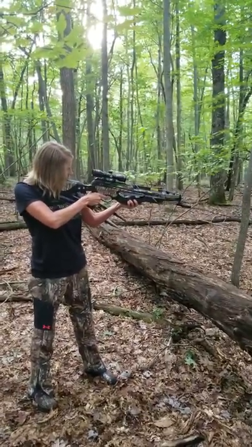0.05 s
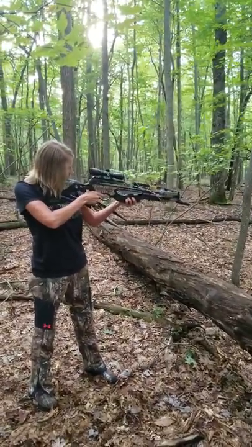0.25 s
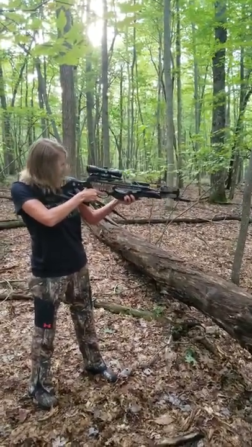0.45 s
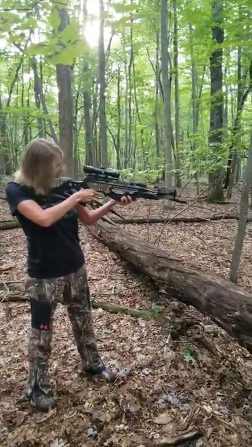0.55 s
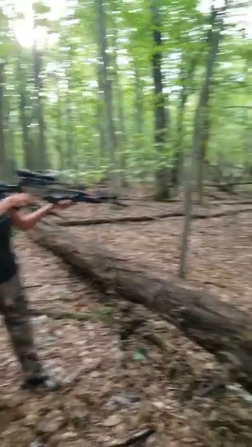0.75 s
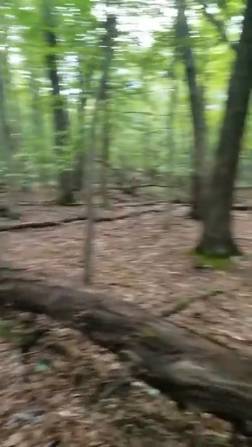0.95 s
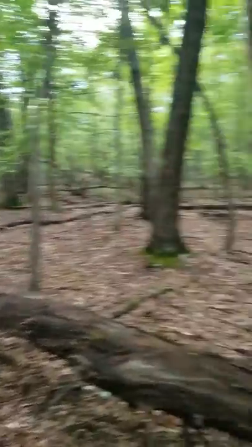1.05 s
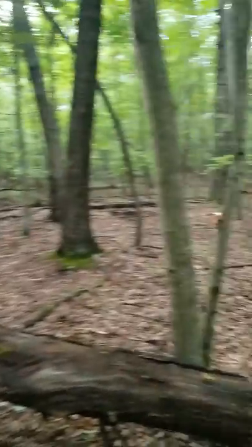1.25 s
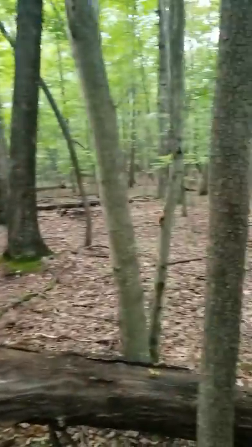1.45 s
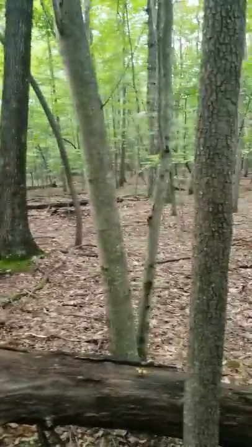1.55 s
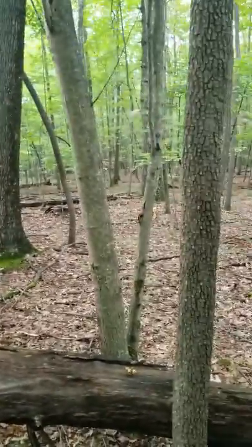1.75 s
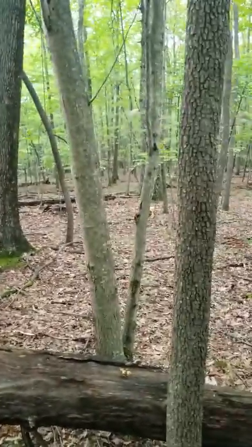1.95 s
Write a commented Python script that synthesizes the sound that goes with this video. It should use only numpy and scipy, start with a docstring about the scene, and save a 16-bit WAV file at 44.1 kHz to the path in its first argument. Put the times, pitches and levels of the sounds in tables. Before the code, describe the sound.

A crossbow fires at about 0.2 s: a brief hiss and a loud, sharp, clattering snap with woody ringing, slightly right. At 0.34 s the bolt hits with a short dull thump, and both ring away among trees. From 0.7 to 1.3 s feet scuff crackling dry leaves close on the right, with soft heel knocks near 1.2 s and a faint last brush. Quiet low rumble, hiss and insects lie beneath.

```python
"""A crossbow is fired in a wood: enveloped noise hisses along the rail and rattles as the string slaps its stops,
while decaying modes ring in limbs and stock. The bolt thumps into a target, a few low-passed modes with dull
returns, and noise dying at two rates per band rings among the trunks. Feet then turn in dry leaves close on the
right: coloured noise, crackle, snaps and heel knocks. Behind lie a low rumble, faint hiss and a band of insects."""
import sys
import numpy as np
from scipy import signal
from scipy.fft import rfft, irfft
from scipy.io import wavfile

SR = 44100
rng = np.random.default_rng(int(sys.argv[2]) if len(sys.argv) > 2 else 0)


def file_out(sig):
    """Save sig as 16-bit WAV at sys.argv[1]."""
    # one column per channel
    cols = np.atleast_2d(sig).T
    # limit, then scale
    lim = np.clip(cols, -1, 1)
    pcm = np.round(lim * 32767).astype(np.int16)
    wavfile.write(sys.argv[1], SR, pcm)


N = 88200
T = np.arange(N) / SR   # time [s]

# Low rumble and faint hiss of the wood: (frequency [Hz], density [dB per Hz])
AIR_SPECTRUM = [(15, -41), (25, -11), (145, -3.5), (270, -17.5), (439, -34.5), (2410, -35.5), (3080, -40.5),
                (16000, -45.5)]
# Swell of the rumble, used about its own mean: (time [s], level [dB])
RUMBLE_SWELL = [(0, -57), (.7, -64.5), (1.45, -65.5), (1.65, -59.5), (2, -60)]
# Loudness of the insect band: (time [s], level [dB])
INSECT_LEVEL = [(.1, -71.5), (1.3, -86.5), (2, -80)]
# Drag of feet in the leaves: (time [s], level [dB])
SCUFF_LEVEL = [(0.712, -68), (.76, -54), (.93, -50), (.955, -53), (0.984, -64), (1.06, -70), (1.08, -63),
               (1.112, -69), (1.123, -61.5), (1.2, -73), (1.44, -82)]
# Colour of the rustle, with sharp peaks in the treble: (frequency [Hz], density [dB per Hz])
RUSTLE_SPECTRUM = [(300, -2.5), (1500, 1), (3000, -5), (4100, -2.5), (5000, -8), (6100, 2), (7400, -7),
                   (9200, -0.5), (10800, -9), (12300, -4.5), (15500, -6.5)]
# Snaps of leaves and twigs, before the rustle colour: (time [s], level [dB], centre [Hz])
LEAF_SNAPS = [(.717, -48, 7500), (.7254, -45, 5960), (.7315, -48, 8000), (.7504, -44, 6032),
              (.7836, -40, 9000), (.8614, -33, 9200), (.8839, -40, 1990), (.918, -42, 9500),
              (.9223, -36, 9150), (1.0364, -55, 9500), (1.0779, -49.5, 7000), (1.1208, -41, 1800),
              (1.2236, -54, 7500), (1.2434, -54, 8900), (1.2864, -58, 9000), (1.3084, -53, 1800),
              (1.3164, -56, 9150), (1.3977, -58, 6000)]
# Soft heel knocks, before their low-pass: (time [s], level [dB], pitch [Hz])
HEEL_KNOCKS = [(1.173, -49.5, 110), (1.221, -49, 330)]
# Modes of the struck target: (pitch [Hz], left level [dB], right level [dB], t60 [s])
TARGET_MODES = [(128, -22.5, -20, 0.056), (225, -6, -8, .021), (950, -12.5, -7, .007),
                (3010, -8, -17.5, 0.0056)]
# Returns of the thump from near trunks: (delay [s], level [dB])
TRUNK_RETURNS = [(.009, -18.5), (.015, -15.5), (.034, -17), (.048, -27)]
# Modes of limbs and stock: (pitch [Hz], level [dB], t60 [s])
BOW_MODES = [(272, -10.5, 0.13), (398, -6.5, .07), (610, 0, .06), (760, -2, .06), (845, -.5, .06),
             (1005, -9, .04), (1135, -5, .06), (1247, -8, .06), (1425, -2.5, 0.05), (2130, -5, .04),
             (2466, -3, .06), (2660, -1, 0.025), (4495, -4.5, .04), (13200, -4, .012)]
# Hiss of string and bolt on the rail: (frequency [Hz], density [dB per Hz])
RAIL_SPECTRUM = [(180, -42), (300, -14.5), (3580, -0.5), (8000, -9), (16000, -7.5)]
# Rattle of the string's slap: (frequency [Hz], density [dB per Hz])
SLAP_SPECTRUM = [(150, -25), (500, -15), (1800, -4), (4400, -4.5), (6500, -11.5), (13000, -9),
                 (16000, -13.5)]
# Ringing of the wood: (frequency [Hz], early t60 [s], late t60 [s])
WOOD_DECAY = [(100, 0.32, 0.17), (260, 0.05, .6), (700, .2, 1), (1840, 0.44, 1.05), (4760, 0.22, 0.8),
              (12800, 0.12, 0.46)]
# Colour of the ringing after the shot: (frequency [Hz], density [dB per Hz])
SHOT_TAIL_SPECTRUM = [(60, -30), (302, -5), (1030, -5), (4380, -6), (12900, -12), (16000, -26.5)]
# Colour of the ringing after the hit: (frequency [Hz], density [dB per Hz])
HIT_TAIL_SPECTRUM = [(45, -25), (149, -1), (1250, -13), (3900, -8), (5090, -18), (12700, -18), (16000, -30)]
# Left-right likeness of the noise: (frequency [Hz], likeness [1 = same in both])
STEREO_LIKENESS = [(60, 1), (250, .92), (600, 1), (1200, .2), (3000, 0.15), (8000, 0.034)]

# Woods
AIR_DB = -60
INSECT_HZ, INSECT_WIDTH_HZ = 2300, 300
CHIRR_HZ, CHIRR_T60_S, CHIRR_DB, CHIRR_DB_PER_S = 2360, .07, -97, 7   # steadier singer, growing louder

# Feet
CRACKLES_PER_S, CRACKLE_DB = 900, -10
SNAP_T60_S, SNAP_WIDE_DB = 0.008, -11   # each snap also carries a broad crack
BRUSH_S, BRUSH_T60_S, BRUSH_DB, BRUSH_BAND_HZ = 1.335, .4, -56, (11200, 12800)   # last thin brush
STEP_CYCLES = 6.9   # heel t60 in cycles of its pitch
LEFT_OWN = 0.32   # power share of scattered rustle at the left port
FEET_LEFT_DB, FEET_LAG_S, SHADOW_HZ = -2, 0.00052, 2920   # left port: weaker, later, duller

# Shot and hit
LET_GO_S, SLAP_S, REBOUND_S, HIT_S = .2068, .2140, .2278, .3439
RAIL_DB, RAIL_T60_S = -17.5, .08
SLAP_DB, SLAP_RISE_S, SLAP_T60_S = -13, .004, 0.13
BOW_DB, KNOCKS_PER_S, RATTLE_DB = -13, 710, -15   # modes, and the lesser knocks that follow
SPREAD_S = .006   # the parts are jolted within this time
REBOUND_DB, REBOUND_HZ = -8, 1600   # light tap on the modes above this pitch
HIT_SOFT_HZ, TRUNK_HZ = 4460, 900   # low-pass of the blow, and of its returns
SHOT_TAIL_DB, HIT_TAIL_DB = -25, -29
LATE_DB, TAIL_RISE_S = -4, 0.0006   # late decay relative to early
SHOT_PAN_DB = 1.5   # right over left

# Microphone
LOW_CUT_HZ, CUTOFF_HZ = 50, 15750
PORT_NOTCH_HZ, PORT_NOTCH_Q = 7320, 20


def from_db(db):
    """Turn dB into gain."""
    return 10 ** (np.asarray(db) / 20)


def rms_one(x):
    """Scale to rms 1."""
    return x / np.sqrt(np.mean(x ** 2) + 1e-20)


def at_hz(points, hz, axis=1):
    """Read a table column on a log-frequency axis."""
    points = np.array(points)
    return np.interp(np.log(hz), np.log(points[:, 0]), points[:, axis])


def lowpass(x, order, hz):
    """Butterworth low-pass."""
    return signal.sosfilt(signal.butter(order, hz, fs=SR, output="sos"), x)


def bandpass(x, order, edges):
    """Butterworth band-pass between two edges in Hz."""
    return signal.sosfilt(signal.butter(order, edges, "band", fs=SR, output="sos"), x)


def drift(rate):
    """Slow random wander of rms 1: noise through two equal poles at rate Hz, made every 40 samples."""
    pole = np.exp(-80 * np.pi * rate / SR)
    white = rng.standard_normal(N // 40 + 2002)
    slow = signal.lfilter([1], [1, -2 * pole, pole ** 2], white)[2000:]   # drop the settling
    return np.interp(np.arange(N) / 40, np.arange(len(slow)), rms_one(slow))


def burst(start, rise, t60):
    """Envelope that rises from its start and dies away exponentially."""
    t = np.maximum(T - start, 0)
    return (1 - np.exp(-t / rise)) * from_db(-60 * t / t60)


def ring(clicks, hz, t60):
    """Damped resonator: a unit click sets a cosine of height 1 ringing."""
    r, w = from_db(-60 / (t60 * SR)), 2 * np.pi * hz / SR
    return signal.lfilter([1, -r * np.cos(w)], [1, -2 * r * np.cos(w), r * r], clicks + 1e-18)


def click(s):
    """A unit click at a time."""
    return 1. * (np.arange(N) == int(s * SR))


def bands(white, shape):
    """Split noise into third-octave stereo bands, each with its likeness and its gain shape(Hz)."""
    out = 0
    edges = 25 * 2 ** np.arange(0, 9.5, 1 / 3)
    for k, (low, high) in enumerate(zip(edges, edges[1:])):
        # neighbouring bands take different noise
        mid, side = bandpass(white[k % 2], 2, [low, high])
        hz = np.sqrt(low * high)
        alike = np.clip(at_hz(STEREO_LIKENESS, hz), -1, 1)
        common = np.sqrt((1 + alike) / 2) * mid
        opposed = np.sqrt((1 - alike) / 2) * side * [[1], [-1]]
        out = out + shape(hz) * (common + opposed)
    return out


def colour(spectrum, db):
    """Gain per band that gives unit white noise this spectrum and rms level."""
    density = from_db(at_hz(spectrum, np.linspace(25, 16000, 2000))) ** 2
    power = np.mean(density) * 32000 / SR
    return lambda hz: from_db(db + at_hz(spectrum, hz)) / np.sqrt(power)


def woods():
    """Lumpy low rumble, faint hiss, and a throbbing band of insects with one thin resonant tone."""
    s, db = np.transpose(RUMBLE_SWELL)
    swell = np.interp(T, s, db - np.mean(db))
    air = colour(AIR_SPECTRUM, AIR_DB)

    def floor_gain(hz):
        """Only the rumble swells and wanders; the hiss holds steady."""
        return air(hz) * (from_db(swell + 1.8 * drift(8)) if hz < 400 else 1)
    floor = bands(rng.standard_normal((2, 2, N)), floor_gain)

    edges = [INSECT_HZ - INSECT_WIDTH_HZ / 2, INSECT_HZ + INSECT_WIDTH_HZ / 2]
    song = rms_one(bandpass(rng.standard_normal((2, N)), 1, edges))
    throb = from_db(np.interp(T, *np.transpose(INSECT_LEVEL)) + 2.5 * drift(15))
    tone = rms_one(ring(rng.standard_normal(N), CHIRR_HZ, CHIRR_T60_S))
    chirr = from_db(CHIRR_DB + CHIRR_DB_PER_S * T) * tone
    return floor + chirr + throb * song


def scuff():
    """Patchy noise with sparse crackle grains, following the drag of the feet; near and scattered parts."""
    s, db = np.transpose(SCUFF_LEVEL)
    struck = rng.random((2, 2, N)) < CRACKLES_PER_S / SR
    grains = struck * rng.laplace(size=(2, 2, N)) ** 3   # cubing makes a few grains stand out
    grit = rms_one(rng.standard_normal((2, 2, N)) + from_db(CRACKLE_DB) * rms_one(grains))
    drag = bands(grit, lambda hz: from_db(2.5 * drift(25)))
    return drag * from_db(np.interp(T, s, db, -140, -140) + 1.2 * drift(60))


def snaps_and_brush():
    """Clicks with short noise snap in a band and broadly; a thin band of noise brushes last."""
    out, noise = 0, rng.standard_normal(N)
    for s, db, hz in LEAF_SNAPS:
        # the envelope opens a sample early so that the click passes
        snap = (8.0 * click(s) + noise) * burst(s - 1 / SR, 1 / SR, SNAP_T60_S)
        pitched = bandpass(snap, 2, [hz / 1.25, hz * 1.33])
        out = out + from_db(db) * (pitched + from_db(SNAP_WIDE_DB) * snap)
    stroke = burst(BRUSH_S, 0.0089, BRUSH_T60_S) * from_db(2.0 * drift(40))
    return out + from_db(BRUSH_DB) * stroke * bandpass(noise, 2, BRUSH_BAND_HZ)


def feet():
    """Coloured rustle close to the right port, shaded at the left, over low-passed heel knocks."""
    near, scattered = scuff()
    near = near + snaps_and_brush()
    lagged = np.roll(near, round(FEET_LAG_S * SR))
    left = np.sqrt(1 - LEFT_OWN) * lagged + np.sqrt(LEFT_OWN) * scattered

    hz = np.maximum(np.arange(N // 2 + 1) * SR / N, 1)
    shade = from_db(FEET_LEFT_DB) / np.sqrt(np.sqrt(1 + (hz / SHADOW_HZ) ** 2))
    port_gains = [shade, np.ones_like(shade)]
    rustle = irfft(rfft([left, near]) * colour(RUSTLE_SPECTRUM, 0)(hz) * port_gains, N)

    heels = sum(from_db(db) * ring(click(s), pitch, STEP_CYCLES / pitch) for s, db, pitch in HEEL_KNOCKS)
    return rustle + lowpass(heels, 1, 500)


def target():
    """One inward blow on the target's modes, then dull returns from near trunks."""
    blow = 0
    for hz, left_db, right_db, t60 in TARGET_MODES:
        blow = blow + from_db([[left_db], [right_db]]) * ring(-click(HIT_S), hz, t60)
    blow = lowpass(blow, 4, HIT_SOFT_HZ)
    dull = lowpass(blow, 1, TRUNK_HZ)
    return blow + sum(from_db(db) * np.roll(dull, int(s * SR), axis=1) for s, db in TRUNK_RETURNS)


def bow():
    """Modes of limbs and stock, each jolted once, then by lesser knocks; the rebound taps the high ones."""
    out = 0
    knocks = rng.random(N) < KNOCKS_PER_S / SR
    force = burst(SLAP_S, SLAP_RISE_S / 2, SLAP_T60_S / 2) * knocks
    for hz, db, t60 in BOW_MODES:
        late, lag = rng.random(2)
        jolt_s = SLAP_S + SPREAD_S * late
        # the less alike the two sides, the later the left may come, up to a cycle
        apart = lag * (1 - np.clip(at_hz(STEREO_LIKENESS, hz), 0, 1)) / hz
        jolt = np.array([click(jolt_s + apart), click(jolt_s)])
        rebound = from_db(REBOUND_DB) * (hz > REBOUND_HZ) * click(REBOUND_S)
        rattle = from_db(RATTLE_DB) * force * rng.standard_normal((2, N))
        out = out + from_db(BOW_DB + db) * ring(jolt + rebound + rattle, hz, t60)
    return out


def wood_tail(start, hz):
    """Ringing of the wood in one band: an early and a late decay that start together."""
    early = burst(start, TAIL_RISE_S, at_hz(WOOD_DECAY, hz))
    late = burst(start, TAIL_RISE_S, at_hz(WOOD_DECAY, hz, axis=2))
    return early + from_db(LATE_DB) * late


def shot_noise():
    """Rail hiss, slap rattle, and ringing after shot and hit: one noise whose band powers add."""
    rail, slap = colour(RAIL_SPECTRUM, RAIL_DB), colour(SLAP_SPECTRUM, SLAP_DB)
    shot, hit = colour(SHOT_TAIL_SPECTRUM, SHOT_TAIL_DB), colour(HIT_TAIL_SPECTRUM, HIT_TAIL_DB)
    hiss = burst(LET_GO_S, .0006, RAIL_T60_S)
    rattle = burst(SLAP_S, SLAP_RISE_S, SLAP_T60_S)

    def gain(hz):
        """Combined level of the four layers in one band."""
        direct = (rail(hz) * hiss) ** 2 + (slap(hz) * rattle) ** 2
        ringing = (shot(hz) * wood_tail(SLAP_S, hz)) ** 2 + (hit(hz) * wood_tail(HIT_S, hz)) ** 2
        return np.sqrt(direct + ringing)
    return bands(rng.standard_normal((2, 2, N)), gain)


def scene():
    """Woods, feet and hit, with the shot and the ringing leaning right."""
    pan = from_db([[-SHOT_PAN_DB / 2], [SHOT_PAN_DB / 2]])
    return woods() + feet() + target() + (shot_noise() + bow()) * pan


def record(dry):
    """The lowest bass falls off, the microphone ports notch the treble, the top is cut."""
    dry = signal.sosfilt(signal.butter(1, LOW_CUT_HZ, "high", fs=SR, output="sos"), dry)
    dry = signal.lfilter(*signal.iirnotch(PORT_NOTCH_HZ, PORT_NOTCH_Q, fs=SR), dry)
    return signal.sosfilt(signal.ellip(12, .3, 70, CUTOFF_HZ, fs=SR, output="sos"), dry)


dry = scene()
out = record(dry)
file_out(out)
```